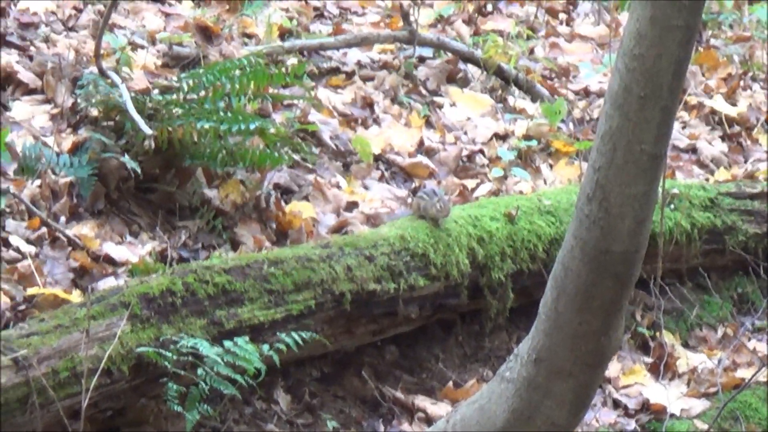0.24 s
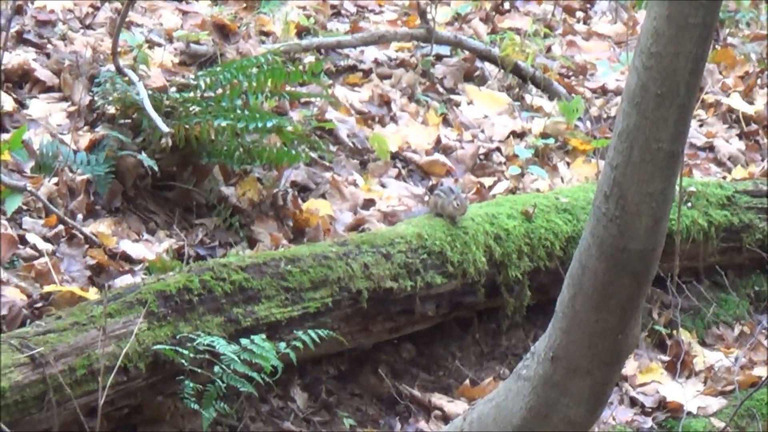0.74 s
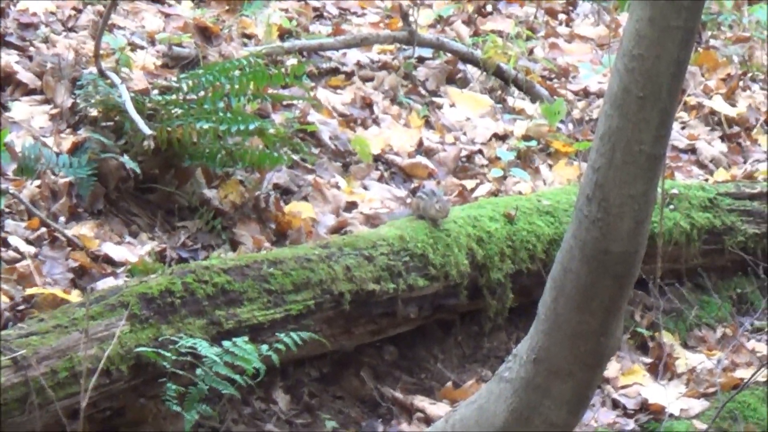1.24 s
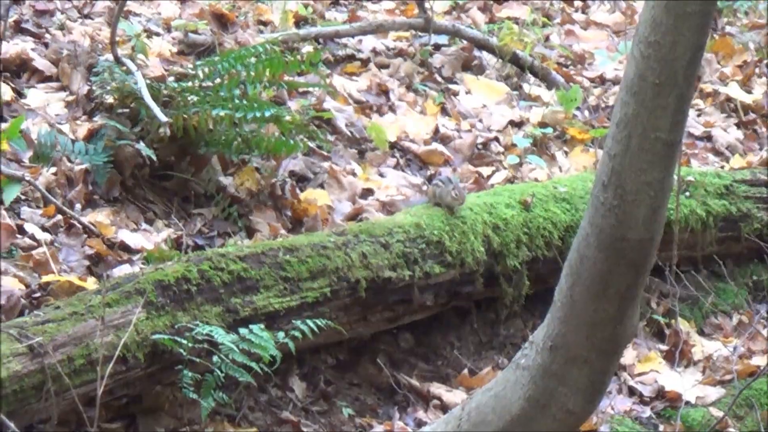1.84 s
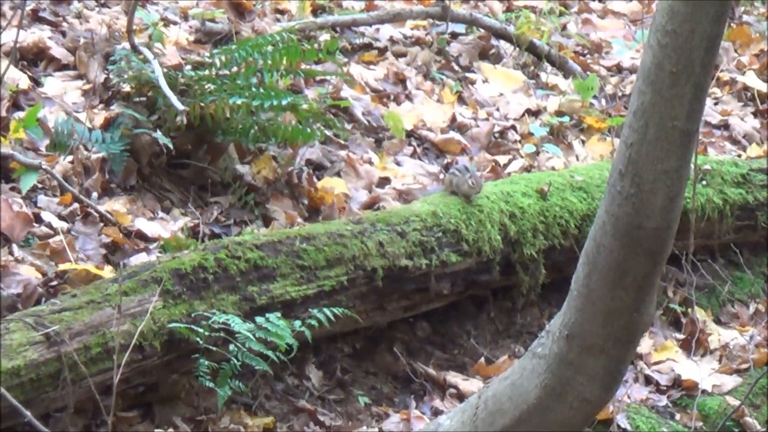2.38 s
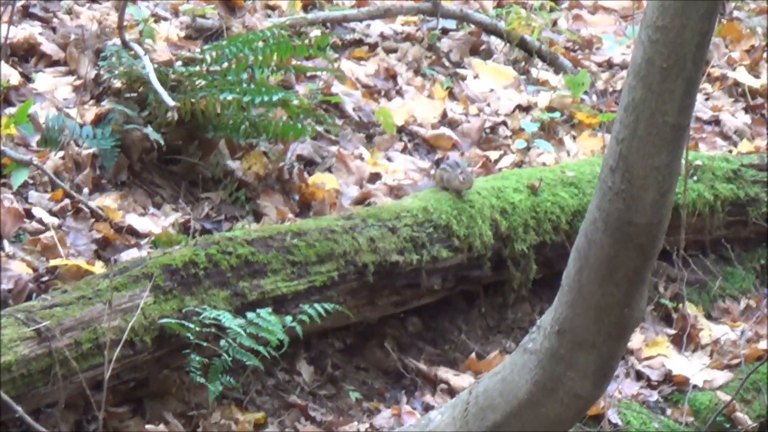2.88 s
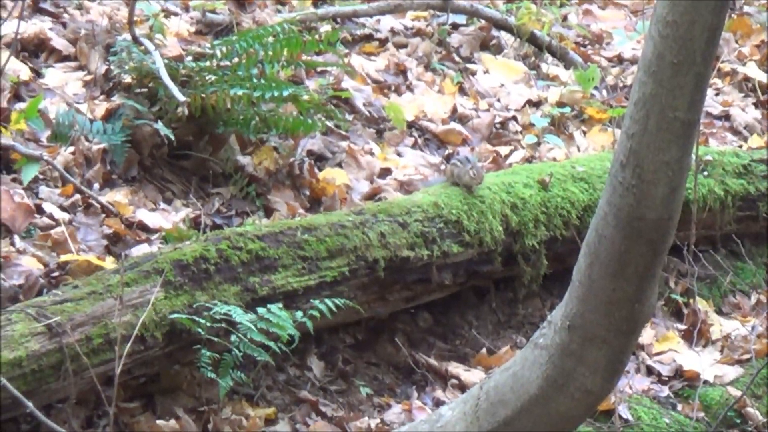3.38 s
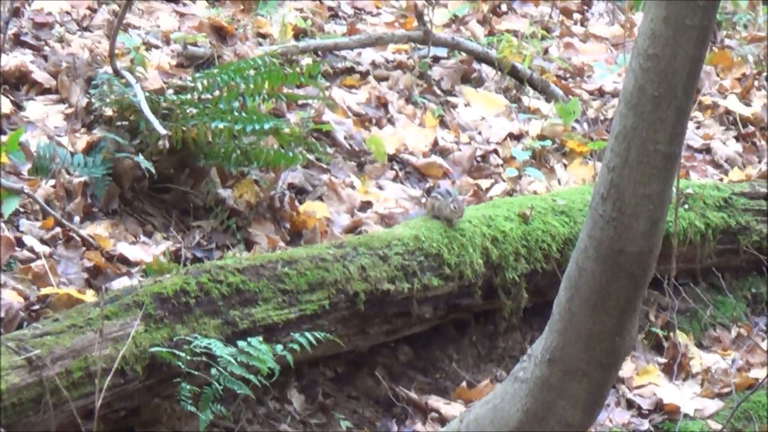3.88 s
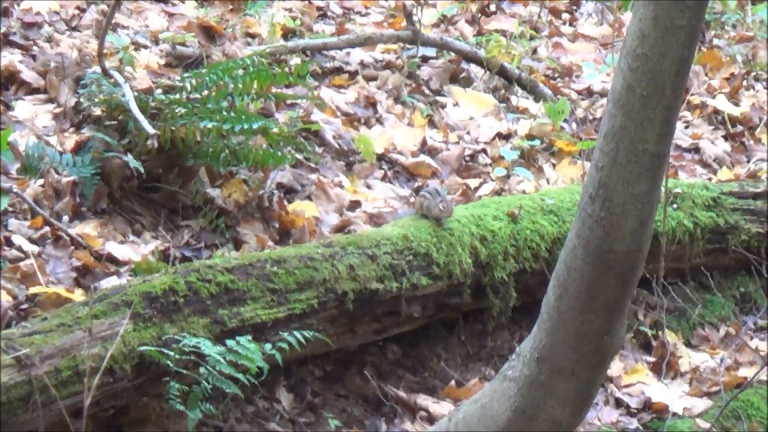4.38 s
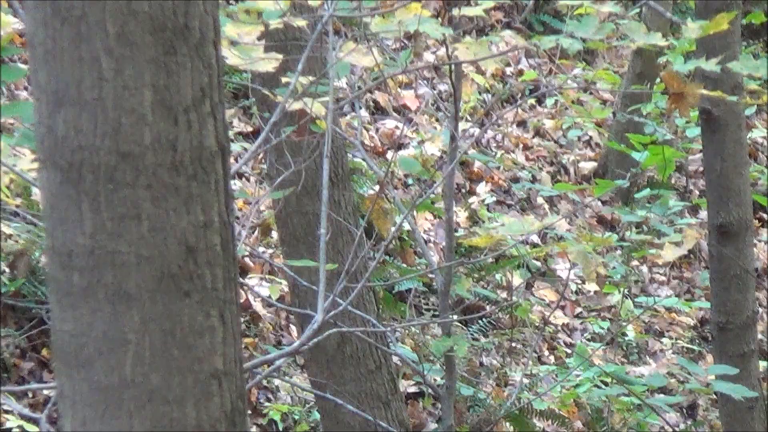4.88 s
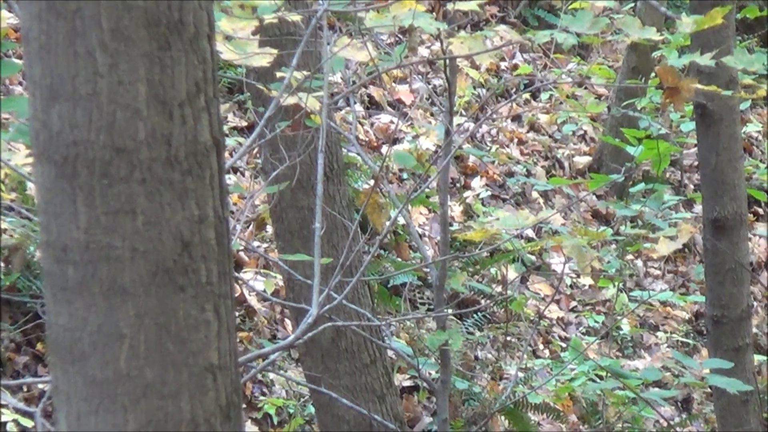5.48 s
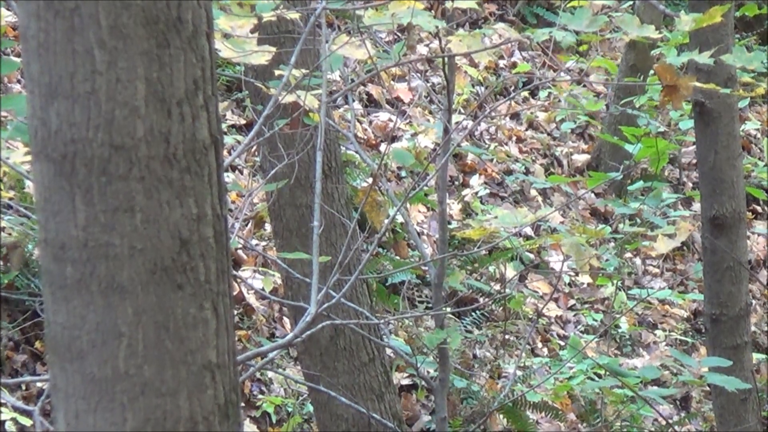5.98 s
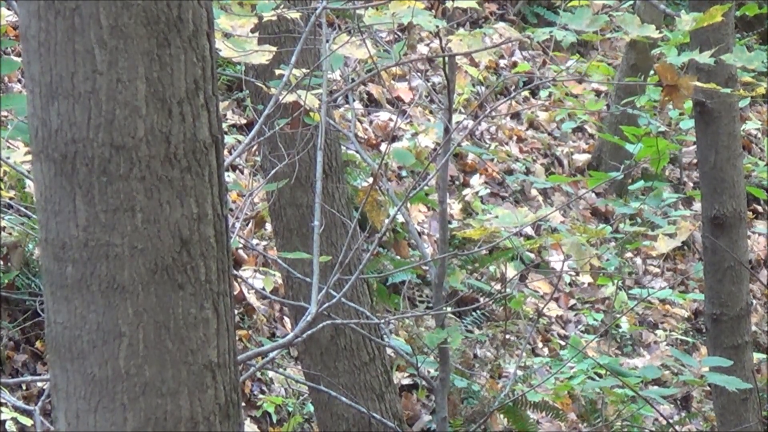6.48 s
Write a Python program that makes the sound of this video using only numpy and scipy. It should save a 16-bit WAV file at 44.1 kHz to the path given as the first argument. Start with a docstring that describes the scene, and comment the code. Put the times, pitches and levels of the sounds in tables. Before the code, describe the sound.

A quiet autumn wood, with a smooth, low-level hush of distant wind and a barely audible, very high steady camcorder whine. From 0.14 s a chipmunk gives eleven piercing chips, roughly every 0.4 s, with longer gaps before those at 2.4 and 2.9 s, the last at 4.5 s. Each is a tiny whistle near 9 kHz that plunges steeply within about 0.02 s, bright and clipped, then scatters among the trunks. Faint woody ticks dot the gaps from 0.9 to 3.1 s. A weak distant call begins near 4.7 s; everything is muted from about 4.8 to 5.3 s. The hush returns with far gliding whistles and a soft hollow thud at 5.4 s. A clearer distant whistle falls at 5.8 s, amid very faint wavering bird notes. Dry leaves shuffle increasingly from 5.9 s, with small cracks around 6.1-6.2 s and the sharpest snaps at 6.3 and 6.5 s, rustling to the end.

```python
"""Chipmunk alarm in the woods

On a mossy log a chipmunk gives eleven chips: whistles that plunge from about 9 kHz and scatter among the trunks.
Twigs tick as damped modes; slower gliding whistles are other chipmunks further off, with a faint bird behind.
All sound is muted for half a second around 5 s; then leaves rustle as noise grains and snap as noise bursts.
A camcorder with a thin steady whine hears it over the hush of the woods, which is smooth filtered noise."""
import sys
import numpy as np
from scipy import signal
from scipy.fft import rfft, irfft
from scipy.io import wavfile
from scipy.ndimage import uniform_filter1d

SR = 44100
rng = np.random.default_rng(int(sys.argv[2]) if len(sys.argv) > 2 else 0)


def persist_wave(psi):
    """Save psi, clipped to +-1, as 16-bit WAV."""
    counts = np.round(np.clip(psi, -1, 1) * 32767).astype(np.int16)
    wavfile.write(sys.argv[1], SR, np.atleast_2d(counts).T)


N = 297231
T = np.arange(N) / SR

# Chips from the log: start_s of the plunge, hold_s before it, pitch_hz before sag and bend,
# level_db before the mix, stress_db added during the hold
CHIPS = [(.1441, 0.0082, 8720, -24.5, -2), (0.5398, 0.008, 8810, -25, 0), (0.933, .0086, 8640, -24.5, -1),
         (1.3278, 0.0081, 8690, -25, -1.5), (1.7294, 0.0088, 8520, -25.5, -4.5),
         (2.3639, 0.0087, 8760, -24.5, 0), (2.8734, 0.0089, 8770, -24, 0.5), (3.2817, .0089, 8710, -25, -1),
         (3.6742, 0.0078, 8690, -25.4, -1.5), (4.0694, 0.0073, 8760, -25.5, -1),
         (4.5159, .0075, 8800, -25.5, -1.5)]
# What the mouth lets through: pitch_hz, level_db
MOUTH = [(2700, -29), (3400, -19.5), (4600, 0), (8800, 1), (10400, 3), (11400, -14), (13300, -20),
         (17000, -59.5)]
# Overtones that join as the mouth gapes: harmonic, wait_s after the plunge starts, level_db
OVERTONES = [(2, 0.0033, -6), (3, 0.0078, -9.5)]
GAPE_S = 0.004  # time that each overtone takes to come in
SAG_OCT_PER_S, PLUNGE_OCT_PER_S, BEND_S = 8, 81, 0.001504
# Loudness: attack, length after the plunge starts, release, fade during the plunge
ATTACK_S, PLUNGE_S, RELEASE_S, FADE_DB_PER_S = 0.003, 0.0192, 0.0022, 117.5
# Faint low note that ends each chip: wait after the plunge starts, length, glide, level against the chip
AFTER_WAIT_S, AFTER_LENGTH_S, AFTER_FROM_HZ, AFTER_TO_HZ, AFTER_DB = 0.021, 0.014, 1550, 894, -32


def chipmunk(waver=0.0035):
    """Each chip holds a high whistle, then plunges and grows overtones; the mouth colours them all."""
    out = np.zeros(N)
    for start_s, hold_s, top_hz, db, stress_db in CHIPS:
        t = np.arange(-hold_s, PLUNGE_S, 1 / SR)
        hz = plunge(t, top_hz, SAG_OCT_PER_S, PLUNGE_OCT_PER_S, BEND_S)
        hz = hz * (1 + waver * tremor(len(t), size=60))

        def harmonic(k):
            """A multiple of the gliding pitch, as loud as the mouth lets it through."""
            return undb(curve(k * hz, MOUTH)[0]) * np.sin(k * phase_of(hz))

        voice = harmonic(0.99)  # the main whistle lies 1 % under the glide
        for k, wait_s, part_db in OVERTONES:
            voice = voice + undb(part_db) * ramp((t - wait_s) / GAPE_S) * harmonic(k)
        effort_db = db + stress_db * ramp(-t / BEND_S) - FADE_DB_PER_S * np.maximum(t, 0)
        envelope = ramp((t + hold_s) / ATTACK_S) * ramp((PLUNGE_S - t) / RELEASE_S)
        add(out, start_s - hold_s, voice * undb(effort_db) * envelope)
        after = note(AFTER_LENGTH_S, AFTER_FROM_HZ, AFTER_TO_HZ, waver)
        add(out, start_s + AFTER_WAIT_S, undb(db + AFTER_DB) * after)
    return out


def plunge(t, top_hz, sag, rate, bend_s):
    """Pitch of a call: it sags throughout and bends near t = 0 into a steeper fall, in octaves per second."""
    return top_hz * 2 ** (-sag * t - rate * bend_s * np.logaddexp(0, t / bend_s))


LOG_LAG_S, LOG_DB = 0.000783, -13.5  # bounce just behind the direct sound


def off_log(x):
    """A sound plus its bounce off the log, which makes a sweeping whistle flutter."""
    hz = np.arange(N // 2 + 1) * SR / N
    bounce = undb(LOG_DB) * np.exp(-2j * np.pi * hz * LOG_LAG_S)
    return irfft(rfft(x) * (1 + bounce), N)


# Brittle snaps in the dry leaves: start_s, peak_db before the mix, low_hz and high_hz edges of the crack
SNAPS = [(5.7641, -35, 2500, 8450), (6.057, -31, 3500, 11500), (6.1255, -26, 3500, 10000),
         (6.135, -23.5, 4540, 14500), (6.1753, -25.5, 3780, 6000), (6.1967, -29, 3500, 10000),
         (6.2744, -27, 1210, 2730), (6.2925, -16.5, 3500, 10800), (6.509, -17, 3600, 9350),
         (6.714, -31.5, 1800, 5000)]


def snaps(decay_s=0.00086, after_db=-20, after_s=0.0046):
    """A brittle stalk breaks with a sharp crack, and its leaf shivers briefly."""
    out, t = np.zeros(N), np.arange(SR // 30) / SR
    for start_s, db, low_hz, high_hz in SNAPS:
        decay = np.exp(-t / decay_s) + undb(after_db) * np.exp(-t / after_s)
        burst = rng.standard_normal(len(t)) * decay
        band = signal.butter(2, [low_hz, high_hz], "band", fs=SR, output="sos")
        crack = signal.sosfilt(band, burst)
        add(out, start_s, undb(db) * crack / np.abs(crack).max())
    return out


# Shuffles in the leaf litter: peak_s, level_db
SHUFFLES = [(5.3, -57), (5.9, -53), (6.079, -47), (6.18, -46), (6.296, -41.5), (6.47, -43.5), (6.57, -48),
            (6.73, -47.5)]
# Spectrum of the rubbing leaves: pitch_hz, level_db
LEAF_COLOUR = [(40, -43), (150, -20), (400, -3.5), (650, -4), (1200, -4), (2650, -4), (4700, -2),
               (9300, -1.5), (11200, -4), (15000, -17)]
# Edges between the ranges in which leaves of different sizes flutter: edge_hz
LEAF_EDGES = [1200, 2500, 4000, 6000, 8000, 10000]
SHUFFLE_RISE_S, SHUFFLE_SETTLE_S = 0.089, 0.12
STIR_DB = -60  # faint stirring from the first shuffle's peak on
LARGEST_GRAIN = 3.5  # cap on the random grain size, whose mean is 1 before the cap


def litter(grain_db=0.5, grain_share=0.2, flutter_db=1.5):
    """Dry leaves rub: dense tiny crackles of uneven size, in fluttering shuffles that swell and settle."""
    sizes = undb(grain_db * np.minimum(rng.exponential(size=N), LARGEST_GRAIN))
    sizes = sizes * (rng.random(N) < grain_share)
    crackle = unit(spread(*colour(rng.standard_normal((2, N)) * sizes, LEAF_COLOUR)))
    below = [signal.sosfiltfilt(signal.butter(4, hz, fs=SR, output="sos"), crackle) for hz in LEAF_EDGES]
    ranges = np.diff([0 * crackle, *below, crackle], axis=0)
    power = undb(STIR_DB) ** 2 * (T > SHUFFLES[0][0])
    for peak_s, db in SHUFFLES:
        away = np.maximum((peak_s - T) / SHUFFLE_RISE_S, (T - peak_s) / SHUFFLE_SETTLE_S)
        power = power + (undb(db) * np.exp(-away)) ** 2
    return np.sqrt(power) * sum(band * undb(flutter_db * walk(160)) for band in ranges)


# Small woody ticks and knocks: start_s, level_db before the mix, pitch_hz of the ring, decay_ms to -60 dB
TICKS = [(.855, -56.5, 1700, 25), (1.0306, -48.5, 1660, 20), (1.5555, -53, 1700, 15),
         (1.8175, -48, 1675, 32), (2.3347, -53.5, 1700, 39), (2.6295, -51, 1430, 21),
         (3.1446, -56, 1409, 14), (5.7641, -49.5, 880, 19), (5.972, -46, 1190, 13)]
# Modes of a tapped twig: ratio to the ring pitch, level_db
TWIG_MODES = [(.8, -21), (0.999, 2), (1.169, -6), (1.339, -8), (1.52, 0), (2.102, -11)]


def ticks(grit=0.35):
    """Small things drop on wood: a few damped modes and a gritty contact."""
    out, t = np.zeros(N), np.arange(SR // 8) / SR
    for start_s, db, hz, decay_ms in TICKS:
        ring = sum(undb(mode_db) * np.sin(2 * np.pi * hz * ratio * t) for ratio, mode_db in TWIG_MODES)
        ring = ring * 1000 ** (-1000 * t / decay_ms)
        contact = grit * rng.standard_normal(len(t)) * np.exp(-t / 0.003)
        add(out, start_s, undb(db) * (ring + contact))
    return out


def thud(start_s=5.384, db=-49.5, rise_s=0.021, low_hz=860, high_hz=1850):
    """One soft, hollow thud among the trees: a band of noise that swells and dies."""
    age = np.arange(SR // 5) / SR / rise_s  # 1 at the height
    band = signal.butter(4, [low_hz, high_hz], "band", fs=SR, output="sos")
    body = signal.sosfilt(band, rng.standard_normal(len(age)))
    out = np.zeros(N)
    add(out, start_s, unit(body) * undb(db) * (age * np.exp(1 - age)) ** 3)
    return out


# Chipmunks further off: start_s of the plunge, hold_s before it, fall_s,
# pitch_hz before sag and bend, plunge_oct_per_s, level_db before the mix
FAR_CALLS = [(3.246, .01, 0.015, 6900, 60, -50), (4.741, .04, 0.037, 11800, 38, -51.5),
             (5.253, 0.027, 0.039, 11470, 18, -44.5), (5.305, 0.047, 0.029, 8720, 9.4, -45.5),
             (5.382, 0.03, 0.034, 8420, 15, -46), (5.817, 0.044, 0.036, 11070, 28.6, -35.5)]
FAR_BEND_S, FAR_SAG_OCT_PER_S = 0.0048, 0.44


def far_chipmunks(waver=0.0042, release_s=0.023):
    """Slower calls of the same shape: a whistle swells while held, then plunges and dies."""
    out = np.zeros(N)
    for start_s, hold_s, fall_s, top_hz, rate, db in FAR_CALLS:
        t = np.arange(-hold_s, fall_s, 1 / SR)
        hz = plunge(t, top_hz, FAR_SAG_OCT_PER_S, rate, FAR_BEND_S)
        hz = hz * (1 + waver * tremor(len(t), size=90))
        envelope = ramp(1 + t / hold_s) * ramp((fall_s - t) / release_s)
        add(out, start_s - hold_s, undb(db) * envelope * np.sin(phase_of(hz)))
    return out


# A faint bird far away: start_s, length_s, from_hz, to_hz, level_db before the mix
BIRD_NOTES = [(5.589, 0.19, 3150, 3110, -62.5), (5.706, 0.16, 1700, 1810, -62.5),
              (5.73, 0.14, 2820, 2930, -63), (5.941, .18, 3130, 3020, -59), (6.27, 0.17, 2570, 2790, -60),
              (6.58, 0.22, 2490, 2800, -61)]


def bird(waver=0.016):
    """Thin, wavering notes, each a pure glide."""
    out = np.zeros(N)
    for start_s, length_s, from_hz, to_hz, db in BIRD_NOTES:
        add(out, start_s, undb(db) * note(length_s, from_hz, to_hz, waver))
    return out


# Leaves close by, trunks, and the far woods scatter sound back: level_db against each other, decay_s to -60 dB
ECHO_DECAYS = [(6.5, 0.047), (-2.5, 0.68), (-20.5, 1.4)]
# Colour of that scatter: pitch_hz, level_db
SCATTER_COLOUR = [(900, 0), (2900, 3), (3800, 7), (4450, 4), (5250, 6), (6000, -2), (7500, -5), (8300, 2),
                  (8900, -3.5), (10000, -1.5), (14000, -9.5)]
FIRST_ECHO_S = 0.0026


def woods(patchy_db=5.5, air_db_per_s=22, air_hz=7000):
    """Stereo echo of the trees: many uneven reflections, whose treble the air soaks up on the longer paths."""
    t = np.arange(SR) / SR
    echoes = rng.standard_normal((2, SR)) * undb(patchy_db * rng.standard_normal(SR))
    power = sum(undb(db) ** 2 * np.exp(-2 * np.log(1000) * t / decay_s) for db, decay_s in ECHO_DECAYS)
    echoes = echoes * np.sqrt(power) * (t > FIRST_ECHO_S)
    low = signal.sosfiltfilt(signal.butter(3, air_hz, fs=SR, output="sos"), echoes)
    echoes = low + (echoes - low) * undb(-air_db_per_s * t)
    return spread(*colour(echoes / np.sqrt(np.sum(echoes[0] ** 2)), SCATTER_COLOUR))


# Spectrum of the far wind: pitch_hz, level_db
HUSH_COLOUR = [(20, -22), (40, -14), (60, -8), (120, -1.5), (190, -2.5), (260, -6), (430, -2.5), (650, -3),
               (950, -7.5), (1600, -10), (2600, -10.5), (4800, -8.5), (8500, -14.5), (15000, -16.5)]
HUSH_DB, SWAY_DB = -56.94, 0.6  # rms level; sway below 900 Hz


def hush():
    """Far wind in the crowns sways gently under a smooth hiss."""
    air = spread(*colour(rng.standard_normal((2, N)), HUSH_COLOUR))
    low = signal.sosfiltfilt(signal.butter(2, 900, fs=SR, output="sos"), air)
    return unit(air + low * (undb(SWAY_DB * walk(4.3)) - 1)) * undb(HUSH_DB)


def note(length_s, from_hz, to_hz, waver):
    """A pure gliding note that swells and fades."""
    u = np.arange(0, length_s, 1 / SR) / length_s
    hz = from_hz * (to_hz / from_hz) ** u * (1 + waver * tremor(len(u), size=130))
    return np.sin(np.pi * u) * np.sin(phase_of(hz))


def phase_of(hz):
    """Running phase of a gliding tone."""
    return 2 * np.pi * np.cumsum(hz) / SR


def tremor(n, size):
    """Quick unsteadiness of a voice over n samples, spread near 1."""
    return unit(uniform_filter1d(rng.standard_normal(SR // 2), size=size))[:n]


def walk(rate_hz):
    """Smooth random wandering, spread near 1."""
    k = int(SR / rate_hz)
    steps = np.repeat(rng.standard_normal(N // k + 1), k)
    return unit(uniform_filter1d(uniform_filter1d(steps, k), k)[:N])


def ramp(u):
    """A smooth step from 0 to 1."""
    return np.sin(np.pi / 2 * np.clip(u, 0, 1)) ** 2


def undb(db):
    """Decibels to gain."""
    return 10 ** (np.asarray(db) / 20)


def unit(x):
    """Scale to rms 1."""
    return x / np.sqrt(np.mean(x ** 2))


def curve(t, rows):
    """The columns of a table, joined by straight lines."""
    knots, *columns = np.transpose(rows)
    return [np.interp(t, knots, c) for c in columns]


def colour(x, points):
    """Filter by a spectrum of pitch_hz and level_db points."""
    n = x.shape[-1]
    hz, db = np.transpose(points)
    bins = np.maximum(np.arange(n // 2 + 1) * SR / n, 1)
    return irfft(rfft(x) * undb(np.interp(np.log(bins), np.log(hz), db)), n)


# Stereo width of the woods: pitch_hz, level_db put on the side signal
WIDTH = [(60, -22.5), (150, -18), (350, -8.5), (700, -4.5), (1500, 0), (3000, -5.5), (6000, -8.5),
         (9500, -9.5), (13500, -33)]


def spread(mid, side):
    """Left and right from a middle and a side signal."""
    return mid + colour(side, WIDTH) * np.array([[1], [-1]])


def add(track, start_s, sound):
    """Mix a sound into a track at a time."""
    i = int(start_s * SR)
    track[i:i + len(sound)] += sound[:max(N - i, 0)]


def heard(x, trees, direct_db, echo_db):
    """A source straight ahead of the microphone plus its echo from the trees."""
    echo = signal.fftconvolve(x[None], trees)[:, :N]
    return undb(direct_db) * x + undb(echo_db) * echo


def scene():
    """The calls, ticks, thud and snaps share the same trees; the far callers reach us mostly as echo."""
    trees = woods()
    return (heard(off_log(chipmunk()), trees, direct_db=1, echo_db=-7.5)
            + heard(snaps(), trees, direct_db=-1, echo_db=-19.5)
            + litter()
            + heard(ticks() + thud(), trees, direct_db=0, echo_db=-8.5)
            + heard(far_chipmunks(), trees, direct_db=-12.5, echo_db=5.5)
            + heard(bird(), trees, direct_db=-8, echo_db=0)
            + hush())


# Mute: time_s, level_db
MUTE = [(4.783, 0), (4.786, -24), (4.845, -42), (4.86, -120), (5.268, -120), (5.274, -20), (5.288, 0)]
WHINE_HZ, WHINE_DB = 15734, -68  # rms level
TOP_HZ = 15950  # highest pitch let through


def record(dry):
    """Adds the camcorder's whine, mutes everything for half a second and cuts the top."""
    whine = np.sqrt(2) * undb(WHINE_DB) * np.sin(2 * np.pi * WHINE_HZ * T)
    gated = (dry + whine) * undb(curve(T, MUTE)[0])
    return signal.sosfilt(signal.ellip(10, 0.2, 70, TOP_HZ, fs=SR, output="sos"), gated)


dry = scene()
out = record(dry)
persist_wave(out)
```